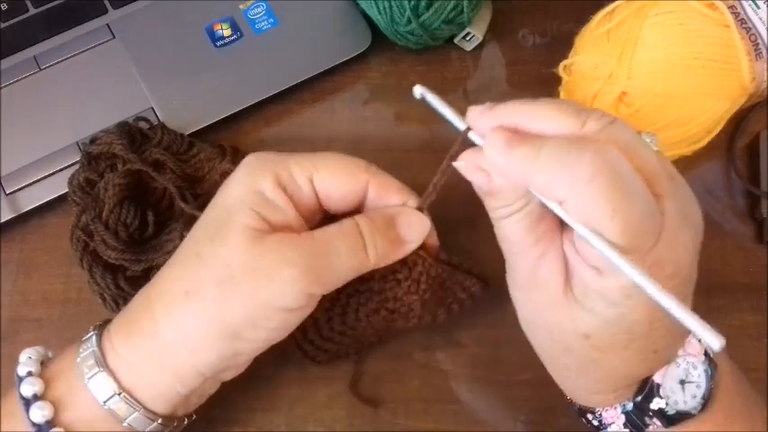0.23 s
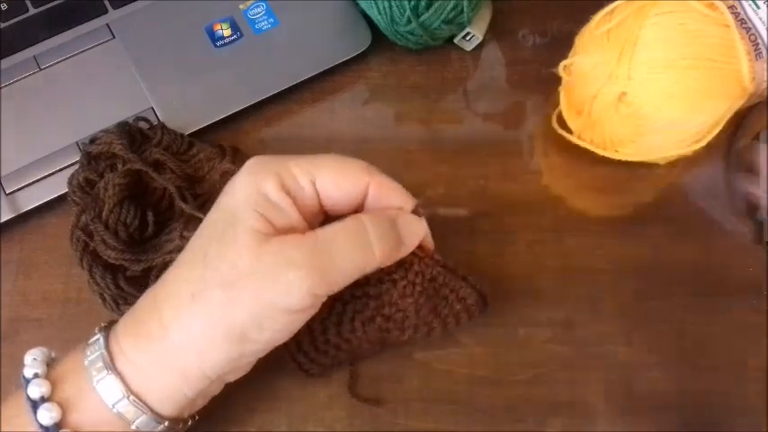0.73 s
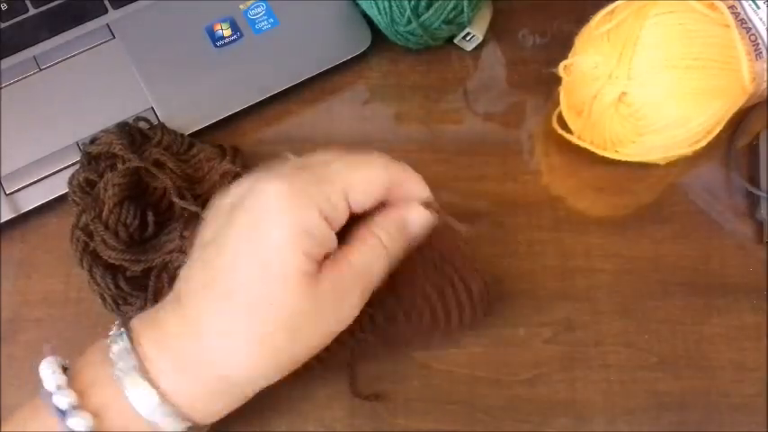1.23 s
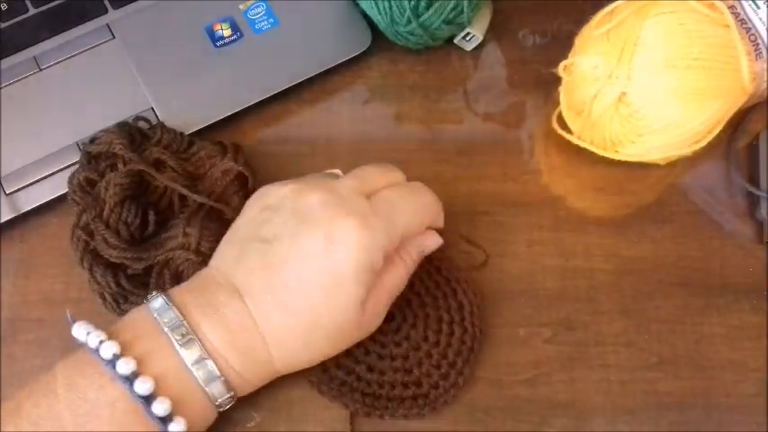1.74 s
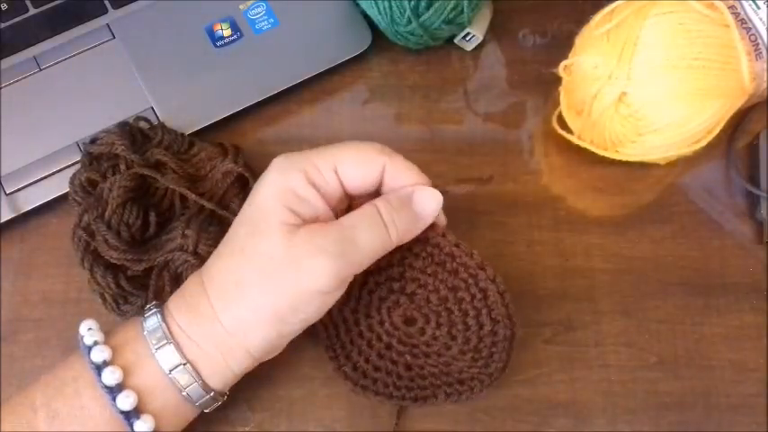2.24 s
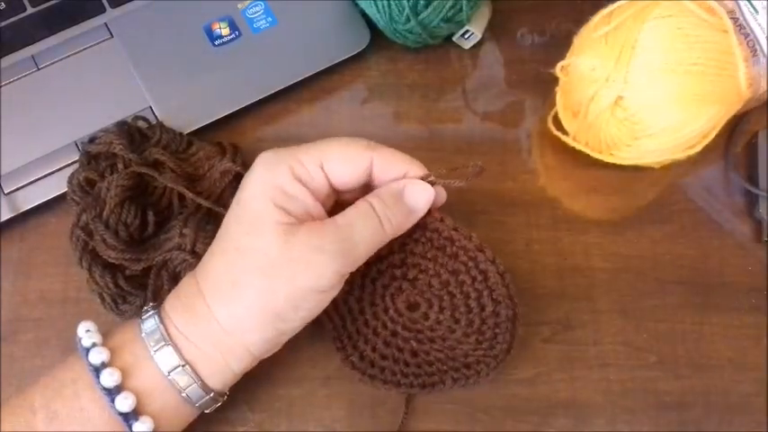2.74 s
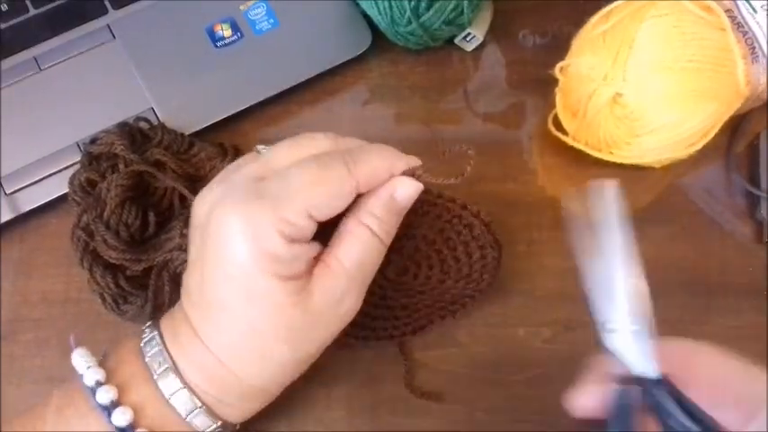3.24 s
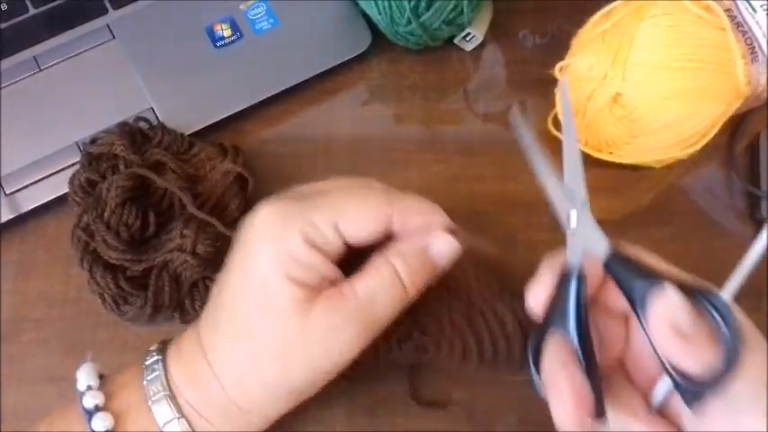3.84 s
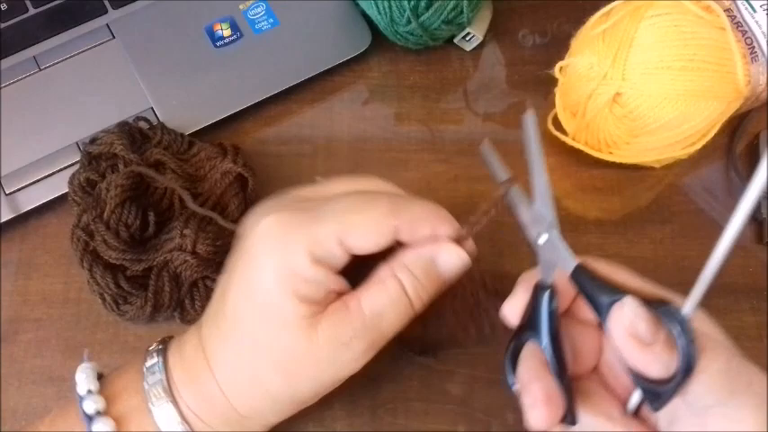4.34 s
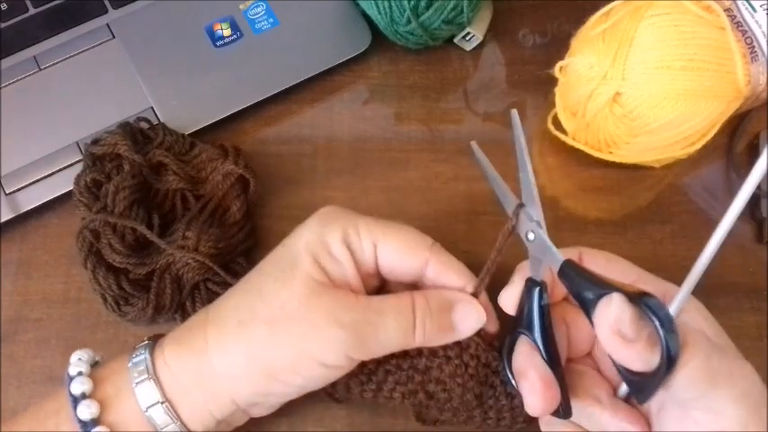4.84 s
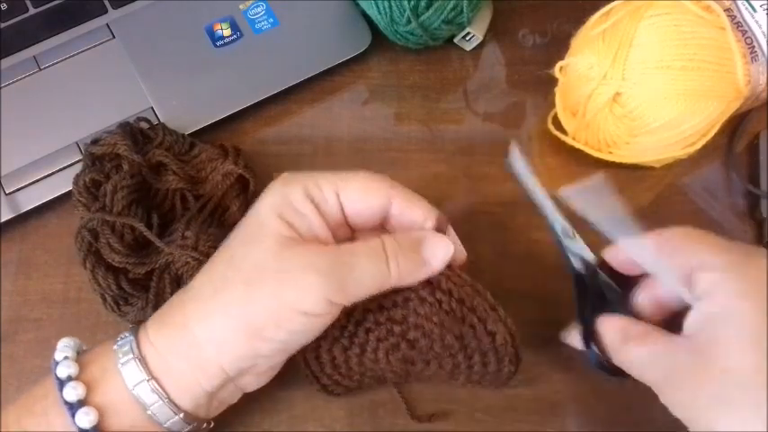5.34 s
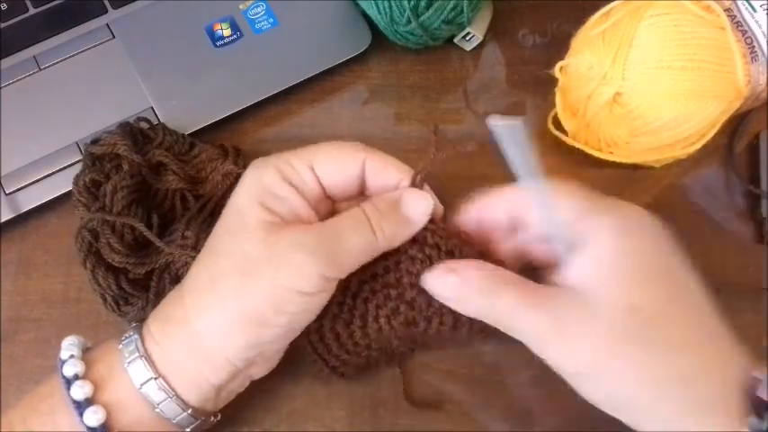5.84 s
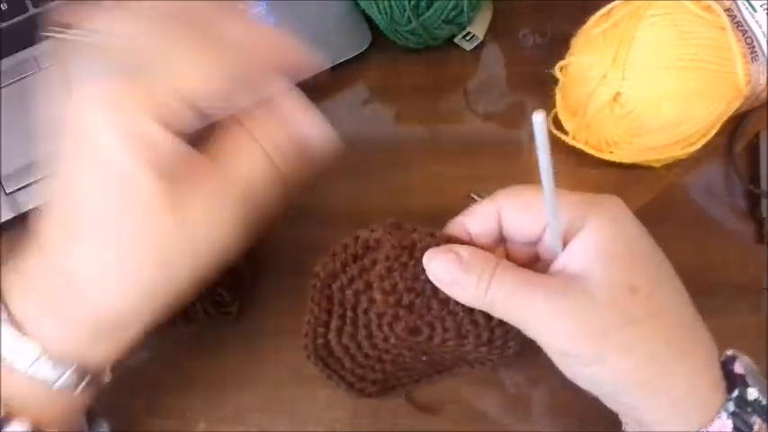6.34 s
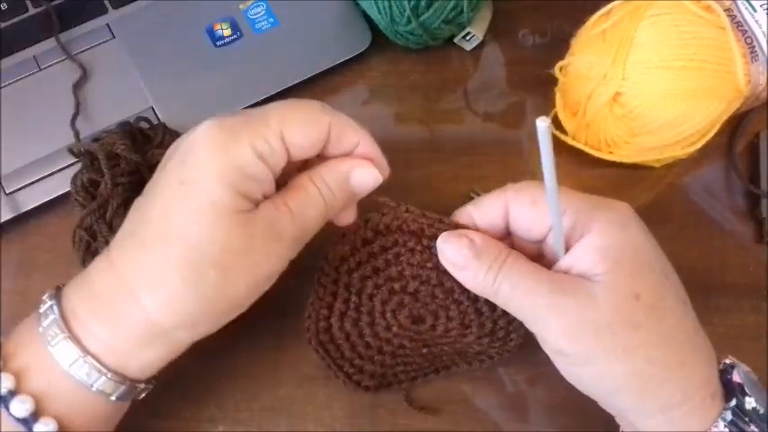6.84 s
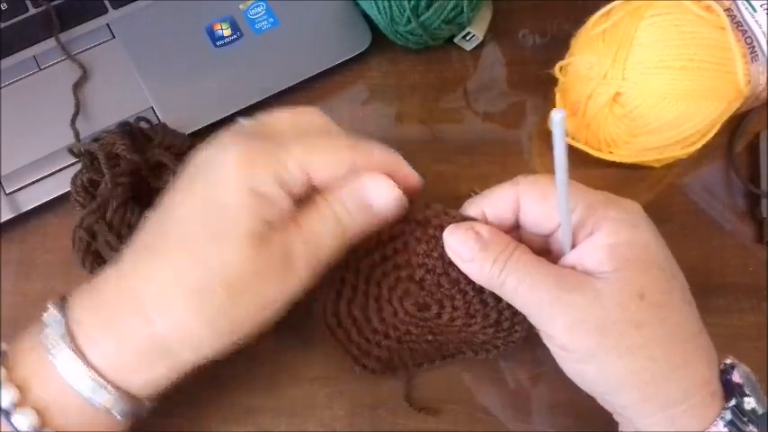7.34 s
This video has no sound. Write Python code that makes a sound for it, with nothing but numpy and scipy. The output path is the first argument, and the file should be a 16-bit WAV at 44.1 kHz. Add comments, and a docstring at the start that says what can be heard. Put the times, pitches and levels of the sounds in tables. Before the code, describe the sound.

Small scissors scrape and clink on a glass desktop, tick faintly in the hand, then land with a sharp clack over quiet room tone.

```python
"""A faint rub of yarn, then small scissors judder and scrape over a glass-topped desk in a small room.
Steel sticks and slips on the glass, and each tap rings the blades. Picked up, they clink against
another metal tool, tick at the pivot in the hand, snip a strand of yarn and are put down with a
sharp clack that shakes the desk. The room answers; its low tone, a slight hum and the faint hiss
of the stereo microphone lie under everything."""
import sys
import numpy as np
from scipy import signal
from scipy.fft import rfft, irfft, next_fast_len
from scipy.io import wavfile
from scipy.ndimage import map_coordinates

SR = 44100
rng = np.random.default_rng(int(sys.argv[2]) if len(sys.argv) > 2 else 0)


def master_out(mix):
    """Clip the mix to full scale and print it as 16-bit PCM to the path in sys.argv[1]."""
    frames = np.transpose(np.atleast_2d(mix))
    ceiling = np.clip(frames, -1, 1)
    pcm = np.round(ceiling * 32767).astype(np.int16)
    wavfile.write(sys.argv[1], SR, pcm)


N = 334719
TIME = np.arange(N) / SR
RING_TIME = np.arange(SR // 2) / SR
MIDDLING_TAP_DB = -30

# Modes of the scissor blades: pitch_hz, level_db, t60_s
BLADE_MODES = [(1700, -19.5, 0.085), (2170, -12.5, 0.063), (2850, -15.5, .055), (3020, -14, 0.053),
               (3220, -10, 0.035), (3610, -11.5, 0.035), (4010, -4.5, 0.05), (4167, 1, 0.048),
               (4500, -8.5, 0.042), (4660, -11, 0.03), (5000, -17, 0.032), (5484, -18.5, 0.05)]
# Spectrum of the scissors on the glass top: freq_hz, gain_db
SCISSOR_SPECTRUM = [(60, -32), (150, -21.5), (500, -10.5), (1100, -15), (1700, -11), (2500, -11),
                    (4200, 1.5), (5000, -17), (6000, -22), (7200, -23.5), (9800, -38), (12500, -37.5),
                    (15500, -38)]
# The scissors tap or catch on the desk: start_s, level_db, crack_db, favoured_hz
DESK_TAPS = [(1.3905, -31, -18.5, 3840), (1.4052, -28, -35.5, 4160), (1.4154, -31.5, -25.5, 4300),
             (1.5055, -34.5, -20.5, 3610), (1.5604, -37, -19.5, 2170), (1.6875, -38.5, -23, 4580),
             (1.7732, -29, -30, 3020), (2.205, -50, -23.5, 4410), (2.253, -48.5, -25, 3915),
             (2.2955, -44, -40, 3550), (2.3685, -48.5, -20.5, 3020), (2.4447, -21, -35.5, 3220),
             (2.4521, -22.5, -43.5, 4660), (2.466, -20, -32, 4400), (2.472, -24.5, -37.5, 2170),
             (2.8245, -41.5, -35, 4700)]
def scissor_taps():
    """Steel strikes the glass and the blades ring briefly."""
    return contacts(with_knock(DESK_TAPS, middling_db=-29), SCISSOR_SPECTRUM, BLADE_MODES,
                    t60_s=0.04, rise_s=0.00085, snap_db=2, ring_db=1,
                    knock_db=-5.5, body_db=-12.5, crack_db=-3.5)


# The scissors judder across the desk: start_s, length_s, level_db, end_fade_db, crack_db, favoured_hz
JUDDER_RUNS = [(1.297, .0185, -17.5, 5.5, -23, 1700), (1.4482, .0195, -23, 7.5, -22, 4800)]
def scissor_judder(slips_per_s=215, jitter_s=0.0004):
    """Dragged steel sticks and slips: a nearly even run of contacts, strongest in the middle."""
    slips = []
    for start, length, db, end_fade_db, *timbre in JUDDER_RUNS:
        for progress in np.linspace(0, 1, 1 + round(length * slips_per_s)):
            when = start + progress * length + jitter_s * rng.standard_normal()
            slips.append((when, db - end_fade_db * (2 * progress - 1) ** 2, *timbre))
    return contacts(with_knock(slips, middling_db=-31.5), SCISSOR_SPECTRUM, BLADE_MODES,
                    t60_s=0.014, rise_s=0.0014, snap_db=-1.5, ring_db=3.5,
                    knock_db=-5.5, body_db=-12.5, crack_db=2.5)


# The scissors slide over the desk: start_s, length_s, level_db
SLIDE_STROKES = [(1.262, 0.035, -46.5), (1.3, 0.17, -51), (1.505, .1, -60.5), (1.672, 0.041, -54),
                 (1.748, 0.03, -49.5), (2.08, 0.41, -67.5), (2.149, 0.015, -58), (2.483, 0.023, -51)]
def scissor_slides(clumps_per_s=110, clump_db=3.5, ring_db=-3):
    """Steel catches on glass in brief clumps; it rasps and stirs the blades during each stroke."""
    knots = rng.standard_normal(N * clumps_per_s // SR + 4)
    clumps = map_coordinates(knots, [TIME * clumps_per_s], order=1)
    slips = friction(per_s=2900, spread_db=3.5) * amp(clump_db * clumps)
    blades = ring(BLADE_MODES, scatter_db=-1.5) * (1 - np.exp(-RING_TIME / 0.001))
    singing = unit(signal.fftconvolve(slips, blades)[:N])
    rasp = unit(coloured(slips, SCISSOR_SPECTRUM))
    strokes = pressure(SLIDE_STROKES, attack_s=0.0069, release_s=0.01192)
    return amp(0.5) * strokes * unit(rasp + amp(ring_db) * singing)


# Modes of the desk top with the scissors lying on it: pitch_hz, level_db, t60_s
DESK_MODES = [(600, -23, 0.05), (940, -24, .05), (1260, -21, .05), (1523, -23, .06), (2870, -10, .04),
              (3300, -6, .05), (3800, -5, .05), (3985, 3, .05), (4100, 2, 0.045), (4680, -4, .05)]
# Spectrum of the held scissors meeting the desk: freq_hz, gain_db
TOUCH_SPECTRUM = [(80, -29.5), (220, -22.5), (450, -6.5), (800, -19.5), (1500, -9.5), (1900, -10.5),
                  (2350, -0.5), (3200, -5), (4000, -3), (4650, 0.5), (5500, -19.5), (8000, -20.5),
                  (10000, -28), (15500, -33.5)]
# First touch on the desk: start_s, level_db, knock_db, crack_db
TOUCHES = [(5.6008, -26.5, -17.5, -30.5)]
def scissor_touch_down():
    """The scissors meet the glass, still damped by the hand, and the room answers faintly."""
    touch = contacts(TOUCHES, TOUCH_SPECTRUM, DESK_MODES,
                     t60_s=0.066, rise_s=0.00088, snap_db=3, ring_db=-7.5,
                     knock_db=-5, body_db=-9, crack_db=-2)
    return touch + room_answer(touch, wet_db=-21, delay_s=0.021)


# Spectrum of the fall, at the desk: freq_hz, gain_db
CLACK_SPECTRUM = [(80, -41.5), (200, -37), (310, -25.5), (500, -19), (750, -23), (1300, -18), (2300, -20.5),
                  (3050, -8), (4050, 0.5), (4850, -9), (5700, -35), (8000, -25.5), (10000, -38),
                  (15500, -43.5)]
# Spectrum of desk and room ringing on after the fall: freq_hz, gain_db
SHAKE_SPECTRUM = [(280, -5.5), (600, -2.5), (1400, -3.5), (2600, -5), (4200, -6), (5200, -5.5), (8000, -4)]
# The scissors fall flat on the glass and bounce: start_s, level_db, knock_db, crack_db
BOUNCES = [(5.6685, -33.5, -22, -30), (5.6713, -11.5, -28.5, -25.5), (5.6745, -16.5, -34.5, -31.5),
           (5.681, -27.5, -14.5, -32.5), (5.6875, -22.5, -16, -41)]
def scissor_clack():
    """Once the hand lets go, the scissors set the whole desk and the room ringing."""
    clack = contacts(BOUNCES, CLACK_SPECTRUM, DESK_MODES,
                     t60_s=0.097, rise_s=0.00045, snap_db=6, ring_db=-2.5,
                     knock_db=-0.5, body_db=-9.5, crack_db=-3)
    return clack + room_answer(coloured(clack, SHAKE_SPECTRUM), wet_db=-12.5, delay_s=0.012)


# Modes of the other metal tool on the desk: pitch_hz, level_db, t60_s
TOOL_MODES = [(1580, -12.5, 0.075), (1650, -12.5, .07), (2186, -10, 0.11), (2877, -1, 0.05),
              (2990, 1, 0.071), (3260, -3.5, 0.027), (3562, -2.5, 0.04), (4080, -4, 0.062),
              (4500, -13, .04), (5490, -19, 0.068), (6850, -21.5, 0.031), (7760, -19, 0.036),
              (8990, -25.5, 0.049)]
# Spectrum of that tool on the glass: freq_hz, gain_db
TOOL_SPECTRUM = [(60, -25.5), (150, -19.5), (900, -30), (1600, -9), (2500, -9), (3100, 6), (4200, -4.5),
                 (5200, -14), (6500, -28), (7900, -22.5), (10000, -34.5), (13000, -36), (15500, -37)]
# Its clinks beside the scissors: start_s, level_db, crack_db, favoured_hz
CLINKS = [(2.3972, -24.5, -26.5, 2186), (2.4084, -28.5, -28.5, 4100), (2.5886, -16, -25.5, 3280),
          (2.5985, -28, -25.5, 2990), (2.6803, -29, -26.5, 2186), (2.8466, -45.5, -14.5, 4020)]
def tool_clinks():
    """The other tool knocks on the glass and rings in its own modes."""
    return contacts(with_knock(CLINKS, middling_db=-26), TOOL_SPECTRUM, TOOL_MODES,
                    t60_s=0.097, rise_s=0.00088, snap_db=-7, ring_db=4,
                    knock_db=-3, body_db=-9, crack_db=-0.5)


# Spectrum of a tick from across the glass: freq_hz, gain_db
TICK_SPECTRUM = [(500, -38.5), (1100, -6.5), (2300, -17), (4200, 0.5), (5600, -37), (7800, -24.5),
                 (10000, -45.5)]
# Pinpoint contacts far off on the glass: arrival_s, peak_db
FAR_TICKS = [(2.545, -33), (2.5693, -33), (2.606, -24.5)]
def glass_ticks(lag_at_1khz_s=0.0022):
    """Bending waves carry treble faster than bass, so a far tick arrives as a tiny falling chirp."""
    track = np.zeros(N)
    pulse = coloured(1.0 * (RING_TIME == 0), TICK_SPECTRUM)
    chirp = filtered(pulse, lambda hz: np.exp(-4j * np.pi * lag_at_1khz_s * np.sqrt(1000 * hz)))
    for arrival, db in FAR_TICKS:
        add(track, arrival - lag_at_1khz_s / 4, amp(db) * chirp / np.abs(chirp).max())
    return track


# A thin ping at the desk: start_s, pitch_hz, level_db, t60_s
GLANCING_PING = (2.606, 10600, -61, .3)
def steel_ping():
    """One glancing touch leaves a single high mode of the steel fading slowly."""
    start, hz, db, t60 = GLANCING_PING
    track = np.zeros(N)
    add(track, start, amp(db - 60 * RING_TIME / t60) * np.sin(2 * np.pi * hz * RING_TIME))
    return track


# Spectrum of a click at the pivot: freq_hz, gain_db
PIVOT_SPECTRUM = [(300, -13), (2000, -34), (2700, -3.5), (4200, 2.5), (5600, -22.5), (7500, -20),
                  (9500, -30), (12000, -22), (15500, -28.5)]
# The scissors click in the hand, above the desk: start_s, level_db
HELD_CLICKS = [(3.323, -44.5), (3.3339, -37), (3.756, -50), (4.4636, -49.5), (4.523, -49), (4.7381, -50.5)]
def pivot_clicks(crack_db_per_db=1.16):
    """The blades click at the pivot; the harder the click, the brighter its crack."""
    clicks = [(start, db, -8.5 + crack_db_per_db * (db - MIDDLING_TAP_DB)) for start, db in HELD_CLICKS]
    return contacts(with_knock(clicks, middling_db=-28), PIVOT_SPECTRUM, BLADE_MODES,
                    t60_s=0.056, rise_s=0.00095, snap_db=8.5, ring_db=-4,
                    knock_db=-3, body_db=-13, crack_db=-2)


# Spectrum of steel slipping on steel: freq_hz, gain_db
LIFT_SPECTRUM = [(3000, -13), (6300, -9), (7700, -3), (10000, -18), (13000, -8), (15500, -14.5)]
# The scissors leave the desk: start_s, length_s, level_db
LIFT_STROKES = [(2.68, .15, -71)]
def scissor_lift():
    """Smooth steel slips off steel with a high whisper."""
    return rubbing(LIFT_STROKES, LIFT_SPECTRUM, per_s=6000, attack_s=0.04, release_s=0.055)


# Spectrum of the cut: freq_hz, gain_db
SNIP_SPECTRUM = [(300, -21.5), (2600, -16), (3500, 5), (4100, -16), (5500, -24), (12000, -35)]
# The cut, faint at the microphone: start_s, length_s, level_db
SNIP_STROKES = [(5.1, .018, -66)]
def yarn_snip():
    """The blades close through the strand in one short crunch of fibres."""
    return rubbing(SNIP_STROKES, SNIP_SPECTRUM, per_s=1300, attack_s=0.0099, release_s=0.013)


# Spectrum of rubbed yarn: freq_hz, gain_db
YARN_SPECTRUM = [(300, -25), (2300, 0), (3600, 5.5), (4400, 8.5), (5600, -20), (12000, -31)]
# Yarn moves in the hand, barely reaching the microphone: start_s, length_s, level_db
YARN_STROKES = [(.63, 0.053, -73.5), (3.8, 0.06, -73), (4.7, 0.086, -78)]
def yarn_rubs():
    """Fibres catch as the yarn is drawn through the fingers and along the blade."""
    return rubbing(YARN_STROKES, YARN_SPECTRUM, per_s=900, attack_s=0.024, release_s=0.08)


# Spectrum of a hand on the glass: freq_hz, gain_db
HAND_SPECTRUM = [(50, -14), (150, -2), (350, -2.5), (900, -10), (3000, -17), (9000, -56)]
# The hand brushes the desk by the scissors: start_s, length_s, level_db
HAND_STROKES = [(1.26, 0.048, -67), (1.405, 0.055, -62), (1.555, 0.012, -59.5), (2.125, 0.074, -65),
                (2.455, 0.026, -62), (2.54, 0.077, -63)]
def hand_brushes():
    """Skin slips over the desk in soft, dull strokes."""
    return rubbing(HAND_STROKES, HAND_SPECTRUM, per_s=370, attack_s=0.0082, release_s=0.036)


# Decay of the small room around the desk: freq_hz, t60_s
ROOM_DECAY = [(150, 1), (1000, 0.55), (4000, 0.52), (8000, 0.36), (14000, 0.15)]
def room_answer(x, wet_db, delay_s):
    """The room returns x late, as a nearly centred stereo tail whose treble dies first."""
    hz, t, noise = signal.stft(rng.standard_normal((2, SR * 3 // 4)), SR, nperseg=256)
    decay = amp(-60 * t / along(ROOM_DECAY, hz)[:, None])
    mid, side = signal.istft(noise * decay, SR, nperseg=256)[1]
    tails = (mid + amp(-30) * np.array([side, -side])) / np.linalg.norm(mid)
    late = np.pad(x, (round(delay_s * SR), 0))
    return amp(wet_db) * signal.fftconvolve(late[None], tails, axes=1)[:, :N]


# Likeness of the background at the microphone's left and right: freq_hz, coherence
STEREO_COHERENCE = [(60, 0.17), (500, 0.94), (2000, 0.045), (5000, 0.11), (15000, 0.044)]
def steady_noise(spectrum, top_hz):
    """Stereo noise of rms 1, most alike in both channels in the low mids."""
    def mid_side_gains(hz):
        angle = np.arccos(np.clip(along(STEREO_COHERENCE, hz), -1, 1)) / 2
        gain = amp(along(spectrum, hz)) / np.sqrt(1 + (hz / top_hz) ** 16)
        return gain * [np.cos(angle), np.sin(angle)]
    mid, side = filtered(rng.standard_normal((2, N)), mid_side_gains)
    return unit(np.array([mid + side, mid - side]))


# Mains hum and a thin whine: pitch_hz, level_db
HUM_TONES = [(119, -89.5), (7050, -97)]
# The room's low tone, all around the microphone: freq_hz, gain_db
ROOM_SPECTRUM = [(25, -13), (50, -13), (90, -7), (200, -4), (300, -3), (410, -1.5), (540, -5.5), (900, -5),
                 (1400, -4), (2400, -9), (3600, -10)]
# The microphone's own hiss: freq_hz, gain_db
HISS_SPECTRUM = [(2500, -31), (3800, 1.5), (4400, -2.5), (5200, -10), (7000, -9), (9000, -10),
                 (12500, -8.5), (15500, -10)]
def background():
    """Steady room tone and microphone hiss, with a slightly unsteady hum and whine."""
    drifts = np.cumsum(rng.standard_normal((len(HUM_TONES), N)), 1) / np.sqrt(SR)
    tones = sum(amp(db) * np.sqrt(2) * np.sin(2 * np.pi * hz * TIME + 0.23 * np.sqrt(hz) * drift)
                for (hz, db), drift in zip(HUM_TONES, drifts))
    room_tone = amp(-70) * steady_noise(ROOM_SPECTRUM, top_hz=3700)
    hiss = amp(-78) * steady_noise(HISS_SPECTRUM, top_hz=17600)
    return room_tone + hiss + tones


def contacts(rows, spectrum, modes, t60_s, rise_s, snap_db, ring_db, knock_db, body_db, crack_db):
    """Each contact snaps, shakes dense modes (fading noise) and rings the given distinct modes."""
    track = np.zeros(N)
    onset = 1 - np.exp(-(RING_TIME / rise_s) ** 2)
    fade = amp(-60 * RING_TIME / t60_s) + amp(snap_db - 60 * RING_TIME / 0.006)
    for start, db, knock, crack, *favoured_hz in rows:
        burst = unit_blow(coloured(rng.standard_normal(len(RING_TIME)) * fade, spectrum))
        ringing = amp(ring_db) * ring(modes, *favoured_hz)
        low, body, high = bands(onset * (burst + ringing))
        hit = amp(knock + knock_db) * low + amp(body_db) * body + amp(crack + crack_db) * high
        add(track, start, amp(db) * hit)
    return track


def ring(modes, favoured_hz=None, scatter_db=3, detune=0.006):
    """Fading modes; the changing grip varies their strength and pitch from one contact to the next."""
    hz, db, t60 = np.transpose(modes)[:, :, None]
    strength, phase, grip = rng.standard_normal((3, len(modes), 1))
    if favoured_hz:  # the spot struck favours modes within about 6 % of this pitch
        db = db + 8 * np.exp(-(np.log(hz / favoured_hz) / 0.06) ** 2)
    cycles = hz * (1 + detune * grip) * RING_TIME + phase
    fades = amp(db + scatter_db * strength - 60 * RING_TIME / t60)
    return unit_blow(np.sum(fades * np.sin(2 * np.pi * cycles), 0))


def bands(x):
    """The low knock, body and high crack of a contact, at equal energy."""
    return [unit_blow(signal.sosfilt(signal.butter(4, edges_hz, 'band', fs=SR, output='sos'), x))
            for edges_hz in [(70, 1200), (1200, 6000), (6000, 16000)]]


def with_knock(taps, middling_db, loss_db_per_db=0.29):
    """Insert each tap's knock_db: the softer the tap, the more of it is a dull knock."""
    return [(start, db, middling_db - loss_db_per_db * (db - MIDDLING_TAP_DB), *timbre)
            for start, db, *timbre in taps]


def rubbing(strokes, spectrum, per_s, attack_s, release_s):
    """Strokes of slips that ring nothing: fibres, skin or smooth steel."""
    slips = friction(per_s, spread_db=1)
    return pressure(strokes, attack_s, release_s) * unit(coloured(slips, spectrum))


def friction(per_s, spread_db):
    """A train of tiny random slips."""
    slipping = rng.random(N) < per_s / SR
    return slipping * rng.choice([-1, 1], N) * amp(spread_db * rng.standard_normal(N))


def pressure(strokes, attack_s, release_s):
    """Each stroke presses in, holds for its length and dies away."""
    return sum(amp(db) * np.clip((TIME - start) / attack_s, 0, 1)
               * np.exp(-np.maximum(TIME - start - length, 0) / release_s)
               for start, length, db in strokes)


def amp(db):
    """Decibels to gain."""
    return 10 ** (np.asarray(db) / 20)


def unit(x):
    """x at rms 1."""
    return x / np.sqrt(np.mean(x ** 2) + 1e-20)


def unit_blow(x):
    """x scaled to the energy of 10 ms at rms 1."""
    return x / np.sqrt(np.sum(x ** 2) / (SR / 100) + 1e-20)


def along(points, hz):
    """(freq_hz, value) points read on a log axis."""
    freqs, values = np.transpose(points)
    return np.interp(np.log(hz + 1), np.log(freqs + 1), values)


def filtered(x, response):
    """x times a response of frequency."""
    n = x.shape[-1]
    size = next_fast_len(n + 8192)
    return irfft(rfft(x, size) * response(np.fft.rfftfreq(size, 1 / SR)), size)[..., :n]


def coloured(x, spectrum, size=2048):
    """x through a causal filter with the given spectrum."""
    cepstrum = irfft(np.log(amp(along(spectrum, np.fft.rfftfreq(size, 1 / SR)))))
    cepstrum[1:size // 2] *= 2
    cepstrum[size // 2 + 1:] = 0
    return signal.fftconvolve(x, irfft(np.exp(rfft(cepstrum))))[:len(x)]


def add(track, start_s, x):
    """Mix x into the track at start_s."""
    part = track[round(start_s * SR):][:len(x)]
    part += x[:len(part)]


def scene():
    """Fetching, snipping and putting down at the desk, over the room tone."""
    handling = (scissor_judder() + scissor_taps() + tool_clinks() + pivot_clicks() + scissor_slides()
                + scissor_lift() + glass_ticks() + steel_ping()
                + yarn_rubs() + yarn_snip() + hand_brushes())
    room = room_answer(handling, wet_db=-19, delay_s=0.011)
    return handling + room + scissor_touch_down() + scissor_clack() + background()


def record(dry):
    """The microphone has two dips in the treble and keeps nothing above its band limit."""
    def dip(hz, centre_hz, width_hz, depth_db):
        return amp(depth_db * np.exp(-((hz - centre_hz) / width_hz) ** 2))
    toned = filtered(dry, lambda hz: dip(hz, 10000, 467, -5.5) * dip(hz, 16000, 350, -4))
    return filtered(toned, lambda hz: hz < 15800)


dry = scene()
out = record(dry)
master_out(out)
```